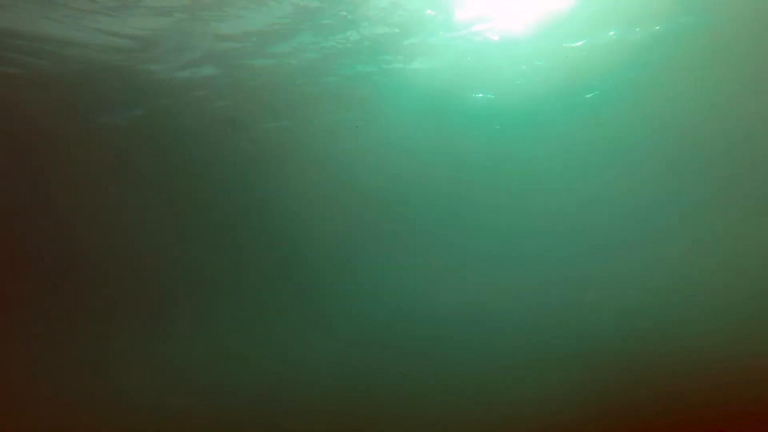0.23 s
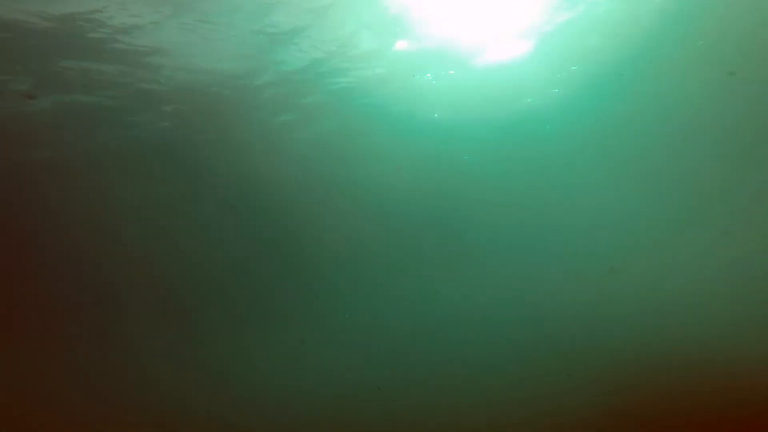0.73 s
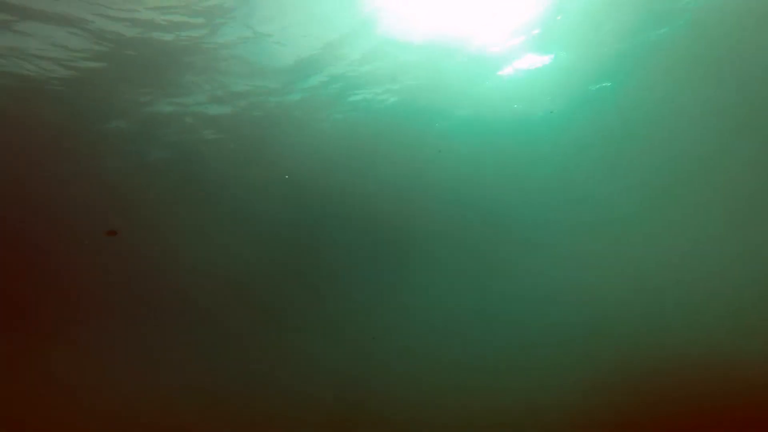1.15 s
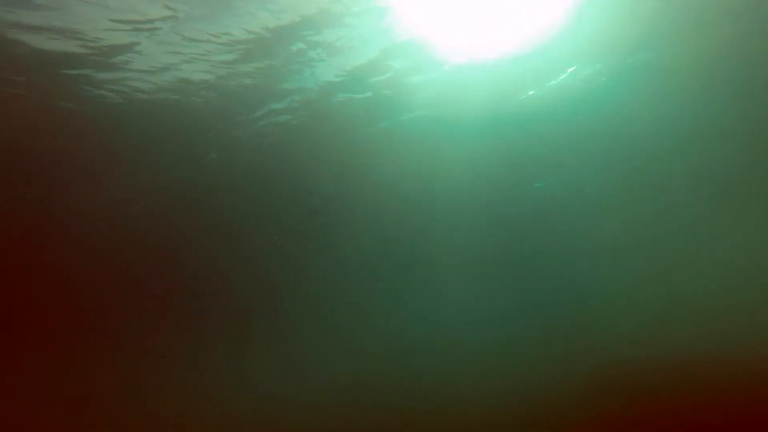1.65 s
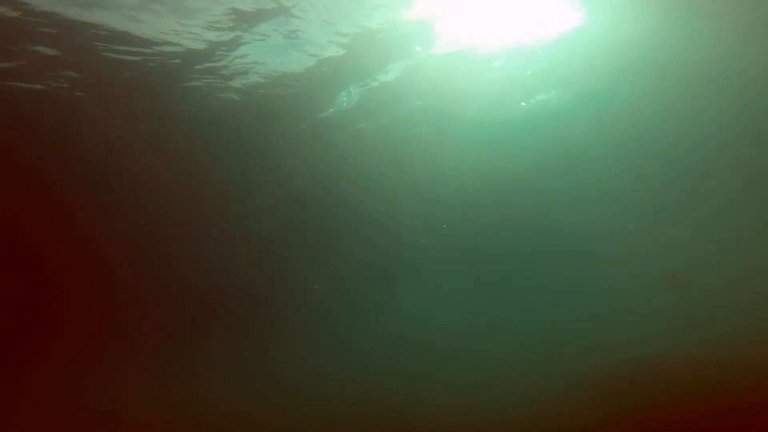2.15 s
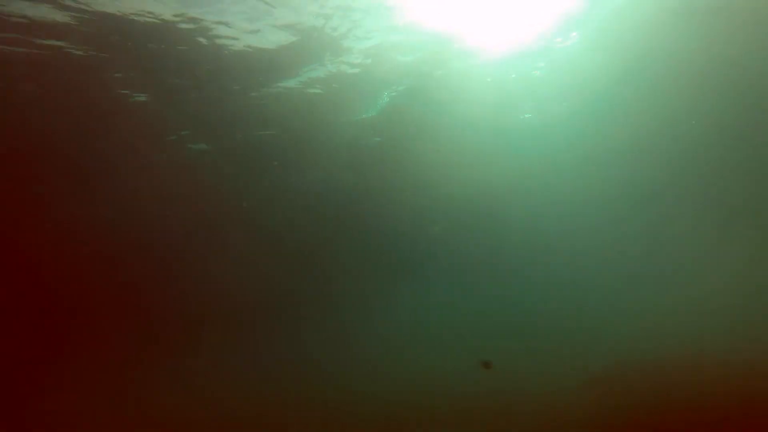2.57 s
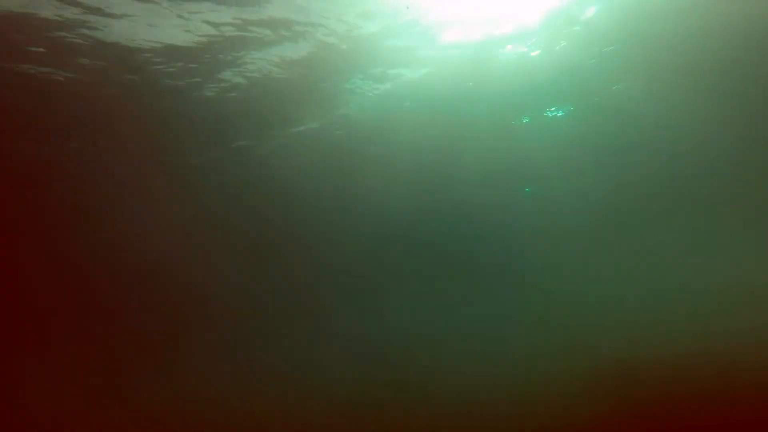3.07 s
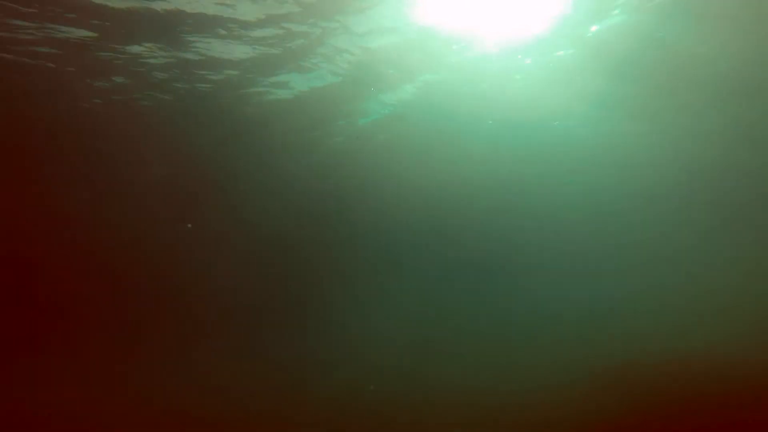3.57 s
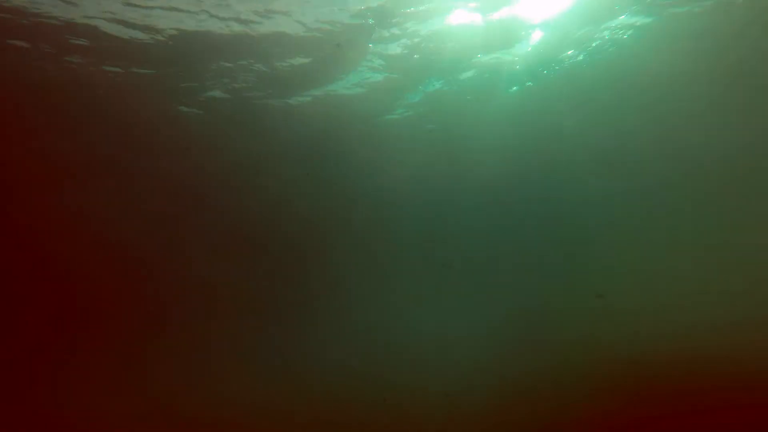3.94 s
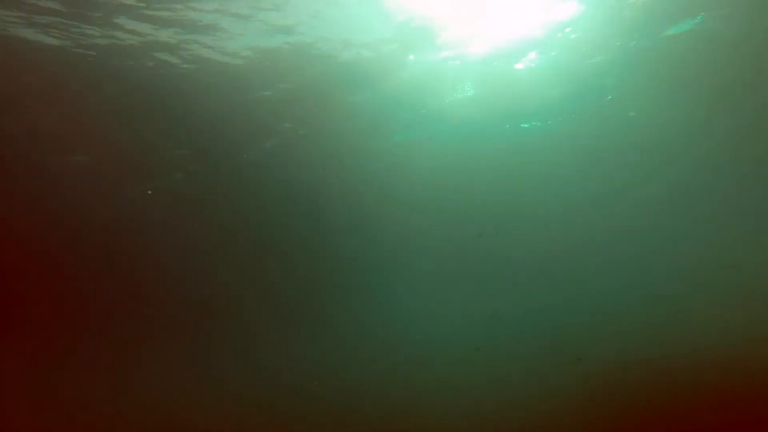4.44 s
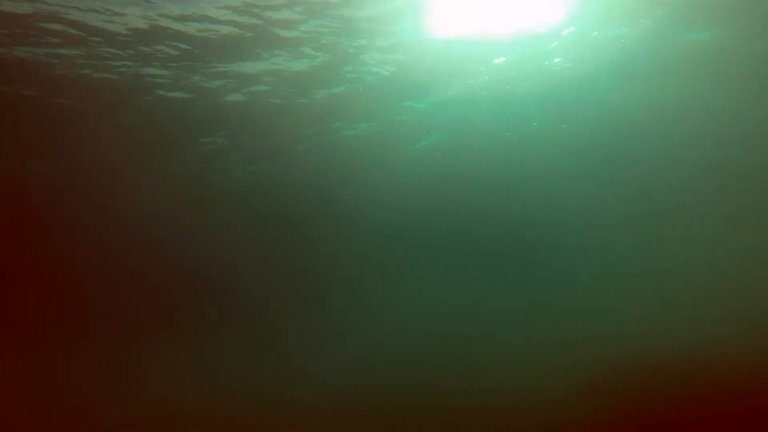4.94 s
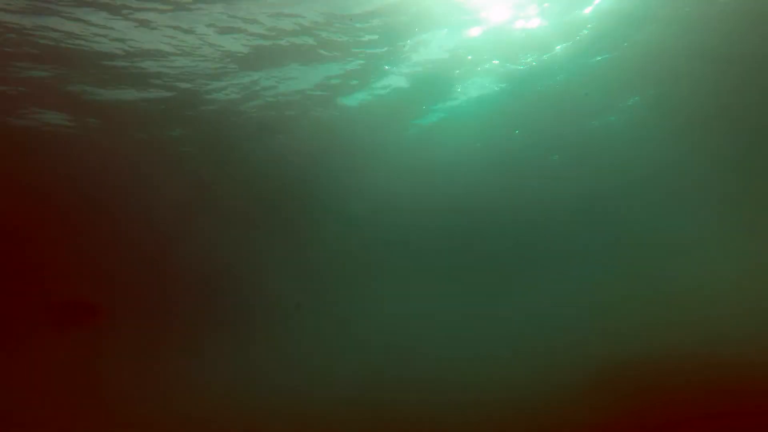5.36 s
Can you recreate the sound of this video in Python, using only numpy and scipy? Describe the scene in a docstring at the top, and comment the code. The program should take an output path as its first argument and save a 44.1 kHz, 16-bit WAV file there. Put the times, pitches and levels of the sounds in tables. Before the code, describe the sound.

Underwater, heard from inside a small camera housing, stones roll and clatter on the sea floor. A dense bed of soft low tumbling, small hollow rattles and fine bright crackle runs throughout, wavering in little avalanches. Between 0 and 0.5 seconds knocks gather quickly into the heaviest tumble at about 0.55, hard blows ringing near 800 hertz over dull thuds. The grit drops suddenly just afterwards, then recovers partly. Deep, uneven water rumble bumps the housing, strongest from 0.5 to 0.9 and again around 1.25, fading after 1.5. Then separate thuds, clacks and pebble clicks continue, with small slides near 2.4 and 2.8. A sharp bright click and knock come at 3.16, another knock at 3.27, and a strong cluster at 3.85. Activity thins, with a solid low thud at 4.8 and scattered knocks until about 5.55. A very faint, wide high hiss lies behind.

```python
"""Stones thud dully and knock on the sea floor, ringing a camera housing near 800 Hz; grit clicks above.
Small rocks roll over in a current, and the microphone listens under water from inside the housing.
Each stone is a short push or scrape played through the colour of the housing or of a pebble.
A surge of water, made of deep shaped noise and slow lumps, rumbles past in the first second and a half
and dies away; shaped noise and random ticks make the crackle, and a faint high hiss lies behind."""
import sys
import numpy as np
from scipy import signal
from scipy.fft import rfft, irfft
from scipy.io import wavfile

SR = 44100
rng = np.random.default_rng(int(sys.argv[2]) if len(sys.argv) > 2 else 0)


def int16_out(signal):
    """Quantize to a 16-bit WAV file."""
    q = np.round(np.clip(np.atleast_2d(signal).T, -1, 1) * 32767)
    wavfile.write(sys.argv[1], SR, q.astype(np.int16))


N = 246959
TIME = np.arange(N) / SR  # s

# colour of the housing when struck: (frequency [Hz], relative level [dB])
HOUSING_COLOUR = [(70, -71.5), (250, -24.5), (470, -14.5), (600, -9.5), (690, -2.5), (775, -0.5), (865, 6),
                  (985, -13), (1100, -11), (1310, -21), (1560, -43.5), (1850, -27), (2150, -45.5),
                  (4000, -71)]
# colour of pebble striking pebble: (frequency [Hz], relative level [dB])
PEBBLE_COLOUR = [(100, -57), (400, -62), (1000, 10.5), (1850, 1.5), (2150, 6), (2800, 12), (3500, 10),
                 (4050, -0.5), (4700, 4.5), (6200, 5), (8500, 7.5), (11000, -6.5), (15500, -7)]
# slides, in which many stones give way together:
# (time of the crest [s], rise [s], rolling gain [dB], rattling gain [dB], scrape level [dB])
STONE_SLIDES = [(0.17, 1, 5, -1, -75.5), (0.513, 0.057, 8, 9.5, -66.5), (2.422, 0.063, 2, 3, -70.5),
                (2.787, 0.035, -2.5, 6.5, -85), (3.11, 0.094, 0.5, 2, -71), (3.89, 0.079, 7.5, 5, -98)]


def thuds(gain_db=0, lowest_share=0.58):
    """The nearest stones roll over with single heavy pushes, with no bass far below their own pitch."""
    # soft blows close by: (time of the crest [s], level [dB], pitch [Hz], swell length [cycles])
    blows = [(0.097, -32, 275, 0.65), (0.3, -37, 213, 0.52), (0.444, -39.5, 278, .7),
             (0.487, -31, 228, 0.5), (0.503, -27.5, 195, 0.57), (0.527, -44, 247, 0.67),
             (0.551, -23, 156, .35), (0.558, -23, 230, 0.26), (0.57, -34, 174, .4), (0.963, -32, 235, 0.43),
             (0.981, -32, 326, 1.2), (0.984, -25.5, 187, 0.54), (1.109, -58, 260, 0.75),
             (1.194, -36.5, 288, 0.34), (1.283, -35.5, 264, 0.76), (1.31, -32, 169, 0.17),
             (1.341, -36, 280, 0.35), (1.48, -38.5, 298, 0.48), (1.777, -35.5, 389, 1.37),
             (2, -41, 378, 1.4), (2.137, -36, 252, 0.57), (2.257, -35.5, 267, 0.65),
             (2.289, -40.5, 174, 0.8), (2.369, -37.5, 270, 0.71), (2.552, -35.5, 260, 0.63),
             (2.687, -35, 242, 0.73), (2.807, -27.5, 290, .53), (2.841, -33, 233, 0.67),
             (2.921, -42.5, 173, 1.1), (2.97, -44, 255, 0.66), (3.044, -33, 129, 0.36),
             (3.07, -41, 124, 0.8), (3.165, -36.5, 234, 0.58), (3.27, -34.5, 238, 0.44),
             (3.394, -39, 230, 0.7), (3.52, -33.5, 253, .6), (3.535, -33.5, 169.5, 1.26),
             (3.566, -32.5, 337, 1.13), (3.836, -38, 227, 0.41), (3.847, -33, 181, 0.87),
             (3.87, -39, 178, 1.5), (3.957, -37.5, 229, 0.73), (3.983, -37.5, 295, 0.86),
             (4.19, -38.5, 208, 0.62), (4.329, -41.5, 264, 1.16), (4.457, -46.5, 255, 0.91),
             (4.629, -46, 264, 0.85), (4.815, -25, 202, 0.73), (5.004, -42.5, 305, 1.4),
             (5.528, -43, 263, 0.72)]
    out = np.zeros(N)
    for (s, db, hz, cycles), phase in zip(blows, rng.random(len(blows))):
        high_pass = signal.butter(10, lowest_share * hz, "high", fs=SR, output="sos")
        push = signal.sosfiltfilt(high_pass, thud(hz, cycles / hz, phase))
        push = amp(db + gain_db) * push
        add(out, s - len(push) / 2 / SR, push)
    return out


def knocks(gain_db=-3.0, usual_db=-34, brightening=0.31, bounce_db=-14, bounce_stretch=1.7,
           usual_settle_s=0.004, hardening=0.405):
    """Hard knocks ring the housing, brighter and shorter when harder; each stone scrapes and bounces twice."""
    # knocks on the housing: (time [s], peak level before the shared gain [dB], pitch of the blow [Hz])
    blows = [(0.137, -35.5, 696), (0.167, -33, 760), (0.218, -31.5, 904), (0.237, -34.5, 810),
             (0.26, -36, 880), (0.43, -34, 830), (0.466, -53, 855), (0.479, -31, 910), (0.494, -27, 780),
             (0.518, -34.5, 765), (0.527, -30.5, 810), (0.54, -22.5, 840), (0.547, -24, 944),
             (0.576, -27.5, 810), (0.614, -32, 657), (0.704, -37.5, 815), (0.807, -36.5, 856),
             (0.982, -33, 835), (1.013, -35, 850), (1.208, -39, 875), (1.281, -40, 710), (1.604, -47, 890),
             (1.697, -38, 900), (1.71, -38, 1070), (1.777, -33.5, 683), (2.093, -42, 1050),
             (2.11, -32, 820), (2.227, -41.5, 885), (2.345, -40, 770), (2.373, -34, 850), (2.397, -39, 870),
             (2.524, -42.5, 940), (2.54, -38.5, 846), (2.703, -40, 820), (2.773, -37.5, 850),
             (3.057, -36.5, 796), (3.077, -40.5, 830), (3.146, -39.5, 860), (3.16, -28.5, 840),
             (3.267, -27.5, 857), (3.378, -36, 820), (3.39, -34, 874), (3.565, -36.5, 585),
             (3.605, -35, 820), (3.775, -38, 725), (3.847, -26.5, 844), (3.94, -40, 780), (3.984, -48, 766),
             (4.189, -37.5, 715), (4.742, -36, 790), (5.254, -40.5, 850), (5.349, -37, 906),
             (5.554, -39, 846)]
    usual_hz = 820
    out = np.zeros(N)
    for (s, db, hz), gaps in zip(blows, rng.uniform(0.607, 3.5, (len(blows), 2))):
        # only knocks harder than usual settle sooner
        settle_s = usual_settle_s * amp(-hardening * max(db - usual_db, 0))
        touch = contact(soft_s=.00005, scatter=.9, scatter_s=settle_s)
        # the blow pulls the ring halfway towards its own pitch
        shift = (hz / usual_hz) ** .5
        housing = ring(HOUSING_COLOUR, shift=shift, tilt_db=brightening * (db - usual_db))
        knock = signal.fftconvolve(touch, housing)
        knock *= amp(db + gain_db) / np.abs(knock).max()
        add(out, s, knock)
        bounce_delays = np.cumsum(gaps) * bounce_stretch * settle_s
        for k, delay in enumerate(bounce_delays):
            add(out, s + delay, amp(bounce_db) / (k + 1) * knock)
    return out


def rolling(avalanches, gain_db=-55.5, settle_db_per_s=0.25, small_settle_db_per_s=0.7, clumping=0.59,
            low_hz=165, high_hz=390, cycles=0.61, lowest_hz=142, highest_hz=440, count=14):
    """Stones of many sizes tumble over; larger ones thud lower and longer, the smallest die down most."""
    out = np.zeros(N)
    for hz in np.geomspace(low_hz, high_hz, count):
        taps = impacts(per_s=20, spread_db=2.5, limit=2)
        resting = amp(-small_settle_db_per_s * TIME * (hz / high_hz) ** 4)
        stone = thud(hz, cycles / hz, rng.random())
        out += resting * evened(signal.oaconvolve(taps, stone, "same"))
    band = signal.butter(10, [lowest_hz, highest_hz], "band", fs=SR, output="sos")
    out = signal.sosfilt(band, out)
    motion = stirring(settle_db_per_s, [roll_db for _, _, roll_db, _, _ in STONE_SLIDES])
    return amp(gain_db) * motion * evened(out * avalanches ** clumping)


def rattling(avalanches, motion, gain_db=-55.0, drop_share=0.3, lull_share=2.0, count=24):
    """A stream of small, short knocks, each stone with its own pitch and hardness, rings the housing."""
    pushes = np.zeros(N)
    shifts = rng.permutation(np.geomspace(.93, 1.03, count))
    for soft_s, shift in zip(np.geomspace(.00002, .0002, count), shifts):
        touch = contact(soft_s, scatter=1.0, scatter_s=.0025)
        knock = signal.fftconvolve(touch, ring(HOUSING_COLOUR, shift=shift))
        taps = impacts(per_s=21, spread_db=3, limit=2.2)
        pushes += evened(signal.oaconvolve(taps, knock)[:N])
    return amp(gain_db) * motion * lull(drop_share, lull_share) * evened(pushes * np.sqrt(avalanches))


def clicks(gain_db=11.0, crack_s=0.0022, lift_db=6, sharpness=7,
           chatter_s=0.018, chatter_db=-53, rebound_db=-5):
    """Pebble on pebble: a crack of a few milliseconds rings at the pebble's pitch, then chatters to rest."""
    # sharp clicks close by:
    # (time [s], level before the shared gain [dB], tilt [dB per octave], pitch of the pebble [Hz])
    pebbles = [(0.3427, -50.5, 1, 6100), (0.48, -47, -12, 2200), (0.4948, -50, -7.5, 2200),
               (0.5103, -48, 2, 3300), (0.538, -46, -9, 2380), (0.5469, -39.5, -3.5, 2150),
               (0.5488, -36, -11, 2250), (0.578, -47, -13, 2400), (0.5877, -55.5, 17, 8540),
               (0.633, -52.5, -3.5, 3020), (0.704, -69, 11, 2800), (0.734, -49, -8.5, 2920),
               (0.8045, -51, 1, 6300), (0.985, -49.5, 1, 2870), (1.568, -49, -5.5, 3400),
               (1.781, -49, 5, 8900), (1.899, -43, 8.5, 3300), (2.1019, -50.5, 0.5, 2840),
               (2.2283, -47, 3.5, 4250), (2.449, -51.5, 11, 12000), (2.542, -50, -0.5, 3240),
               (2.715, -50.5, 7, 3300), (3.1605, -32.5, -3.5, 4550), (3.2665, -45.5, -0.5, 2450),
               (3.3774, -44, 8, 3100), (3.3808, -43.5, -0.5, 3120), (3.585, -48.5, 11, 8500),
               (3.7947, -50.5, 6, 3180), (3.8478, -42, 0, 1900), (3.852, -47, -2, 2800),
               (4.371, -50.5, 7, 7000), (4.692, -52, 8, 8200), (5.273, -49, -0.5, 2590)]
    out, t = np.zeros(N), np.arange(2048) / SR
    for (s, db, tilt_db, hz), grit in zip(pebbles, rng.standard_normal((len(pebbles), len(t)))):
        colour = ring(PEBBLE_COLOUR, tilt_db=tilt_db)
        own_pitch = signal.lfilter(*signal.iirpeak(hz, sharpness, fs=SR), colour)
        colour = colour + (amp(lift_db) - 1) * own_pitch
        touch = contact(soft_s=.000005, scatter=.9, scatter_s=crack_s)
        crack = signal.fftconvolve(touch, colour)
        chatter = signal.fftconvolve(grit * np.abs(grit) * np.exp(-t / chatter_s), colour)
        add(out, s, amp(db + gain_db) * crack / np.linalg.norm(crack))
        rest_db = min(chatter_db, db + rebound_db)
        add(out, s, amp(gain_db + rest_db) * chatter / np.linalg.norm(chatter))
    return out


def scraping(avalanches, tilt_db=-8):
    """In each slide coarse gravel grinds between the stones: a dense run of dull clicks."""
    taps = impacts(per_s=600, spread_db=4.5, limit=3)
    grind = evened(signal.oaconvolve(taps * avalanches, ring(PEBBLE_COLOUR, tilt_db=tilt_db))[:N])
    level = sum(amp(db) * slide(s, rise_s) for s, rise_s, _, _, db in STONE_SLIDES)
    return level * lull() * grind


def gravel(motion, gain_db=-82, crack_s=0.003, ring_db=-20, ring_s=0.013, dull_db=-3, bright_db=8, count=8):
    """Smaller pebbles click at random, louder as the bed rattles, in a range of brightnesses."""
    out, t = np.zeros(N), np.arange(2048) / SR
    fade = np.exp(-t / crack_s) + amp(ring_db) * np.exp(-t / ring_s)
    for tilt_db in np.linspace(dull_db, bright_db, count):
        burst = rng.standard_normal(len(t)) * fade
        crack = signal.fftconvolve(burst, ring(PEBBLE_COLOUR, tilt_db=tilt_db))
        taps = impacts(per_s=1.2, spread_db=4, limit=2)
        out += signal.oaconvolve(taps, evened(crack))[:N]
    return amp(gain_db) * motion * lull() * evened(out)


def crackle(avalanches, motion, wash_db=-74, tick_db=-75.0, tail_db=-17, tail_s=0.014, follow=0.2, count=24):
    """Countless far grains merge into a hiss; nearer ones tick in clusters, in a range of brightnesses."""
    # colour of the grit: (frequency [Hz], relative level [dB])
    grit_colour = [(600, -12.5), (1500, -4), (1850, -3.5), (2100, -8.5), (2800, -6.5), (3400, -6),
                   (4000, -13), (4600, -8.5), (5200, -10), (7200, -8), (8500, -2), (11000, -10.5),
                   (12400, -9.5), (15500, -22)]
    ticks, t = np.zeros(N), np.arange(1024) / SR
    fade = np.exp(-t / 0.00015) + amp(tail_db) * np.exp(-t / tail_s)
    for tilt_db in np.linspace(-4, 2, count):
        burst = rng.standard_normal(len(t)) * fade
        tick = signal.fftconvolve(burst, ring(grit_colour, tilt_db=tilt_db))
        taps = impacts(per_s=8, spread_db=5, limit=2.8)
        ticks += evened(signal.oaconvolve(taps, tick)[:N])
    wash = through(rng.standard_normal(N), grit_colour) * avalanches ** .3
    grains = amp(wash_db) * wash + amp(tick_db) * evened(ticks * avalanches)
    return lull(low_share=0.18) * motion ** follow * grains


def surge(gain_db=1):
    """Each surge presses on the housing as a deep rumble of shaped noise and leaves eddies that die away."""
    # colour of the rumble: (frequency [Hz], relative level [dB])
    rumble_colour = [(6, -10), (20, 2), (42, 3), (60, -0.5), (85, 0.5), (125, 2.5), (170, -5.5), (260, -22),
                     (500, -72)]
    # water against the housing: (time of the crest [s], level before the gain [dB], rise [s], fall [s])
    surges = [(0.26, -46.5, 0.023, 0.052), (0.62, -42, 0.12, 0.18), (1.25, -42.5, 0.079, 0.08)]
    # the eddies build up, then die away into still water; levels are before the gain
    wake_s, wake_peak_db, still_db = 1, -51, -99
    wake_rise_db_per_s, wake_fall_db_per_s = 5.5, 9
    wake_db = wake_peak_db - np.maximum(wake_rise_db_per_s * (wake_s - TIME),
                                        wake_fall_db_per_s * (TIME - wake_s))
    pushes = [amp(db) * swell(s, rise_s, fall_s) for s, db, rise_s, fall_s in surges]
    pressure = np.sqrt(np.sum(np.square(pushes), axis=0) + amp(wake_db) ** 2 + amp(still_db) ** 2)
    return amp(gain_db) * pressure * through(rng.standard_normal(N), rumble_colour)


def buffets(cycles=0.6):
    """Eddies break off the surges and bump the housing in deep, uneven lumps."""
    # bumps of water: (time of the crest [s], level [dB], pitch [Hz])
    bumps = [(0.516, -31.5, 34.2), (0.59, -35, 129), (0.622, -38.5, 34.4), (0.654, -35.5, 155),
             (0.7, -37, 87), (0.732, -53, 96), (0.777, -29.5, 84), (0.821, -39, 72), (0.846, -36.5, 124),
             (1.108, -34.5, 129), (1.194, -36, 104), (1.22, -45, 106), (1.288, -39, 90),
             (1.341, -38.5, 116)]
    out = np.zeros(N)
    for (s, db, hz), phase in zip(bumps, rng.random(len(bumps))):
        push = amp(db) * thud(hz, cycles / hz, phase)
        add(out, s - len(push) / 2 / SR, push)
    return out


def top_hiss(gain_db=-85, follow=5.3):
    """A faint high hiss of shaped noise, opposite in the two ears, dips more deeply than the crackle."""
    # colour of the hiss: (frequency [Hz], relative level [dB])
    airy_colour = [(6000, -37.5), (10000, -30.5), (11300, -22), (12400, -8.5), (14000, -10.5), (15500, -24)]
    side = amp(gain_db) * lull() ** follow * through(rng.standard_normal(N), airy_colour)
    return np.array([side, -side])


def housed(x):
    """The housing's narrow resonances ring on after everything that reaches them; its dips take away."""
    # resonances and dips: (frequency [Hz], width [Hz], lift [dB])
    modes = [(319, 34, 4), (433, 25, -8.5), (470, 54, 5.5), (769, 6.5, 6), (1060, 30, 4), (1340, 65, 7.5),
             (1850, 53, 0), (1990, 160, -2.5)]
    out = x.copy()
    for hz, width_hz, db in modes:
        out += (amp(db) - 1) * signal.lfilter(*signal.iirpeak(hz, hz / width_hz, fs=SR), x)
    return out


def thud(hz, half_s, phase, rise_share=0.87, glide=0.013, overtone_db=-21, overtone=2.05):
    """A soft push with a faint overtone; it swells faster than it fades, and its pitch creeps up."""
    t = np.arange(-SR // 16, SR // 16) / SR
    u = t / half_s
    turns = hz * (t + glide * half_s * (np.hypot(1, u) - 1)) + phase
    body = np.exp(-.5 * (u / np.where(u < 0, rise_share, 2 - rise_share)) ** 2)
    faint = amp(overtone_db) * body ** 2 * np.cos(2 * np.pi * overtone * turns)
    return body * np.cos(2 * np.pi * turns) + faint


def contact(soft_s, scatter, scatter_s):
    """The push of one touch: a soft pulse, then a short random scrape that gives it its own colour."""
    t = np.arange(1024) / SR
    push = scatter * rng.standard_normal(len(t)) * np.exp(-t / scatter_s) / np.sqrt(scatter_s * SR / 2)
    push[0] = 1
    return signal.fftconvolve(push, t * np.exp(-t / soft_s))[:len(t)]


def impacts(per_s, spread_db, limit):
    """Randomly timed taps of either sign: many small, a few large."""
    size = amp(spread_db * np.minimum(rng.exponential(1, N), limit))
    return size * rng.choice([-1, 1], N) * (rng.random(N) < per_s / SR)


def ring(points, shift=1, tilt_db=0, size=8192):
    """Causal response to one tap of a body with this colour, shifted in pitch and tilted per octave."""
    hz, db = np.transpose(points)
    octave = np.log2(np.abs(np.fft.fftfreq(size, 1 / SR)) + 1)
    tilted_db = db + tilt_db * np.log2(hz / hz[0])
    log_gain = np.log(amp(np.interp(octave, np.log2(hz * shift), tilted_db)))
    # minimum phase: the Hilbert transform of the log gain gives the phase
    response = np.fft.ifft(np.exp(np.conj(signal.hilbert(log_gain)))).real[:size // 2]
    return response / np.abs(response).max()


def through(x, points, shift=1):
    """Plays x through a body of this colour; rms 1."""
    return evened(signal.oaconvolve(x, ring(points, shift))[:N])


def clumps(per_s, depth_db):
    """A gain that wanders at random: stones move in small avalanches, with lulls between."""
    hz = np.fft.rfftfreq(N, 1 / SR)
    wander = irfft(rfft(rng.standard_normal(N)) * (hz / per_s) ** .5 * np.exp(-hz / per_s), N)
    return evened(amp(depth_db * np.clip(evened(wander), -2.5, 2.2)))


def stirring(settle_db_per_s, gains_db):
    """How strongly the bed moves: it settles as the current slackens and changes by a gain in each slide."""
    slides_db = sum(db * slide(s, rise_s) for (s, rise_s, *_), db in zip(STONE_SLIDES, gains_db))
    return amp(slides_db - settle_db_per_s * TIME)


def slide(crest_s, rise_s, fall_share=0.34):
    """The motion of one slide, 1 at its crest; it stops faster than it starts."""
    return swell(crest_s, rise_s, fall_share * rise_s)


def swell(crest_s, rise_s, fall_s):
    """A smooth rise to 1 at the crest and a smooth fall."""
    return np.exp(-.5 * ((TIME - crest_s) / np.where(TIME < crest_s, rise_s, fall_s)) ** 2)


def lull(drop_share=1, low_share=1):
    """Gain of the lull just after the heaviest knock: a sudden drop that recovers, and a long shallow dip."""
    # depths are for a share of 1; the shallow dip ends once the surges have passed
    start_s, drop_db, drop_recover_s = 0.553, -15, 0.06
    low_db, end_s, low_recover_s = -3, 1.48, 0.12
    since = TIME - start_s
    drop = np.exp(-np.abs(since) / drop_recover_s)
    low = .5 - .5 * np.tanh((TIME - end_s) / low_recover_s)
    return amp((since > 0) * (drop_share * drop_db * drop + low_share * low_db * low))


def dulled(x, above_hz=11000, follow=2.5):
    """In the lull the highest treble of the grit dips further."""
    low = signal.sosfiltfilt(signal.butter(4, above_hz, fs=SR, output="sos"), x)
    return low + (x - low) * lull(drop_share=0.27, low_share=follow)


def amp(db):
    """Decibels to gain."""
    return 10 ** (np.asarray(db) / 20)


def evened(x):
    """Scales to rms 1."""
    return x / np.sqrt(np.mean(x ** 2) + 1e-20)


def add(mix, s, sound):
    """Mixes a sound in at time s."""
    part = mix[max(round(s * SR), 0):][:len(sound)]
    part += sound[:len(part)]


def scene(settle_db_per_s=0.93):
    """The same small avalanches stir stones and grit; the housing passes them to both ears alike."""
    avalanches = clumps(per_s=14, depth_db=3)
    motion = stirring(settle_db_per_s, [rattle_db for _, _, _, rattle_db, _ in STONE_SLIDES])
    grit = dulled(crackle(avalanches, motion) + gravel(motion) + scraping(avalanches))
    bed = rolling(avalanches) + rattling(avalanches, motion) + grit
    water = surge() + buffets()
    return housed(water + bed + thuds() + knocks() + clicks()) + top_hiss()


def record(dry, edge_hz=15450):
    """The recorder's band limit: a steep low-pass."""
    low_pass = signal.firwin(511, edge_hz, window=("kaiser", 8), fs=SR)
    return signal.oaconvolve(dry, low_pass[None], "same", axes=1)


dry = scene()
out = record(dry)
int16_out(out)
```